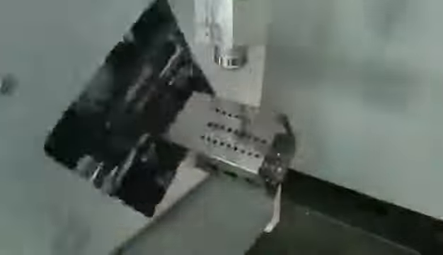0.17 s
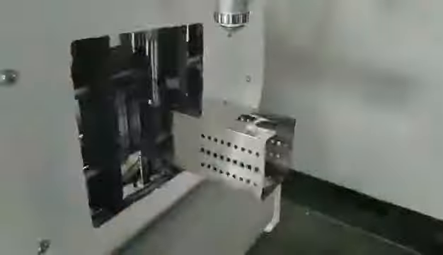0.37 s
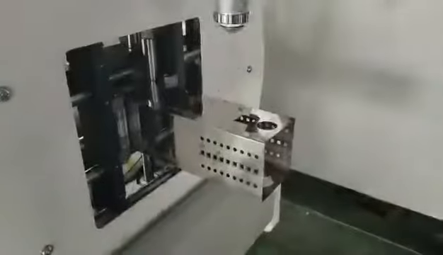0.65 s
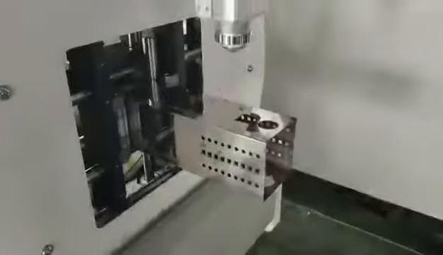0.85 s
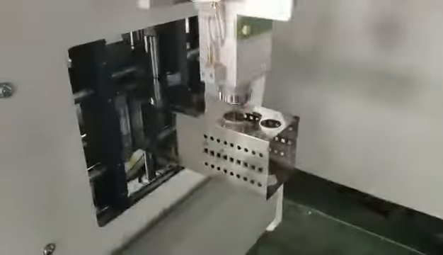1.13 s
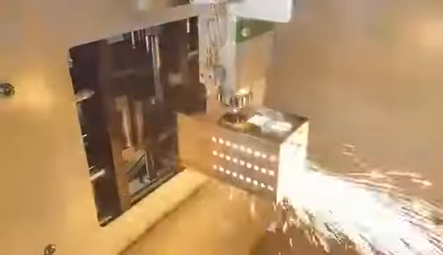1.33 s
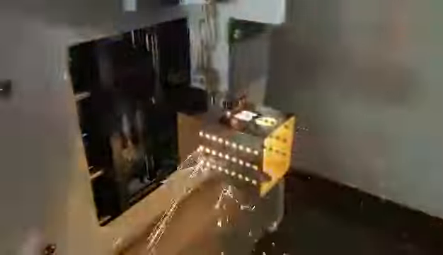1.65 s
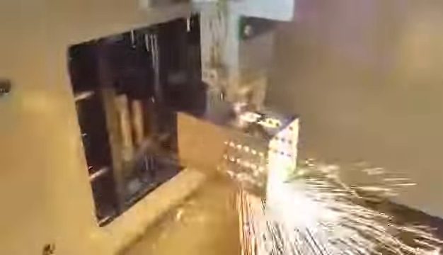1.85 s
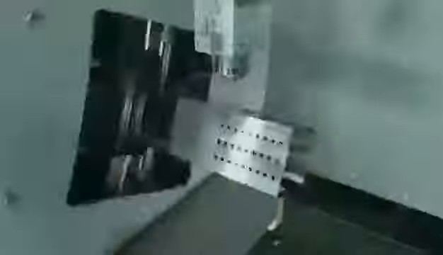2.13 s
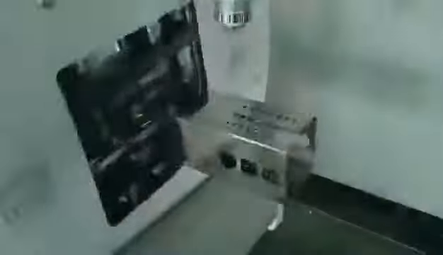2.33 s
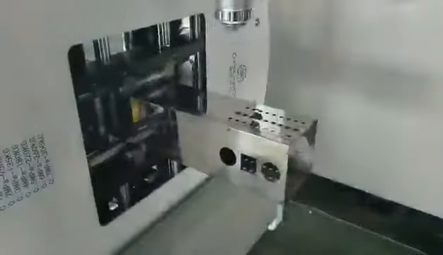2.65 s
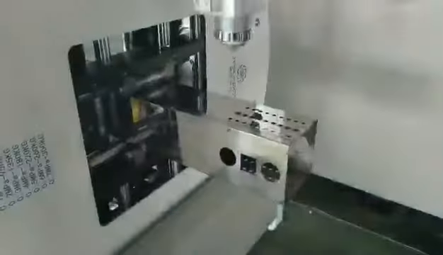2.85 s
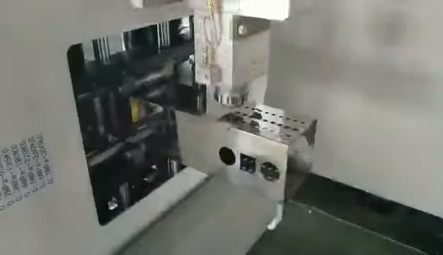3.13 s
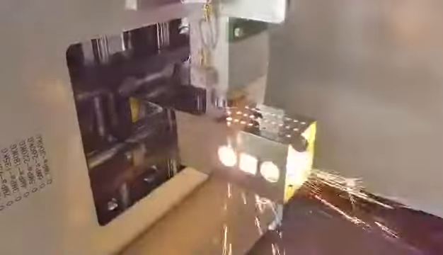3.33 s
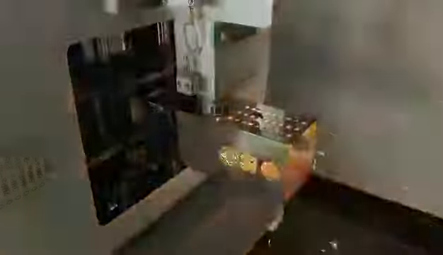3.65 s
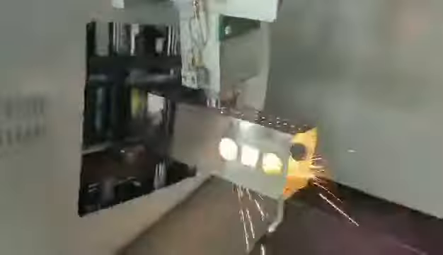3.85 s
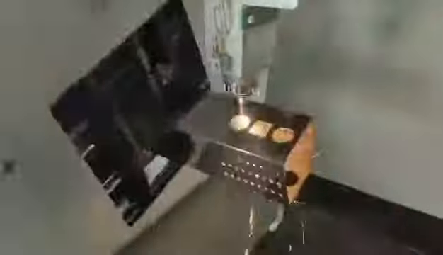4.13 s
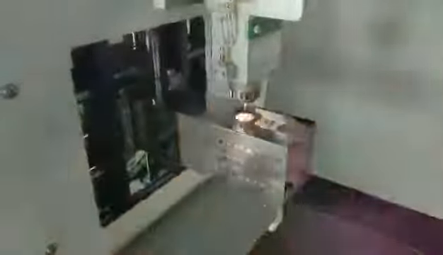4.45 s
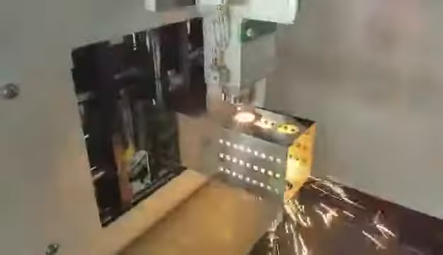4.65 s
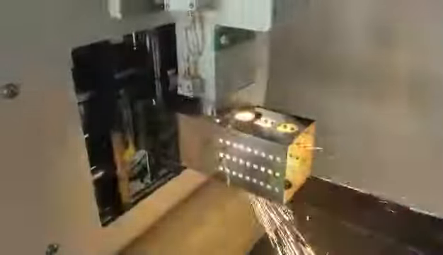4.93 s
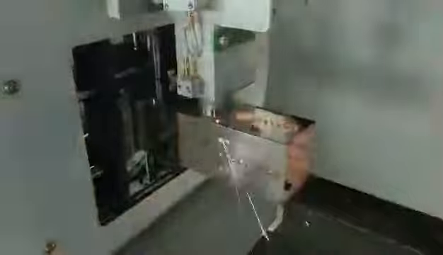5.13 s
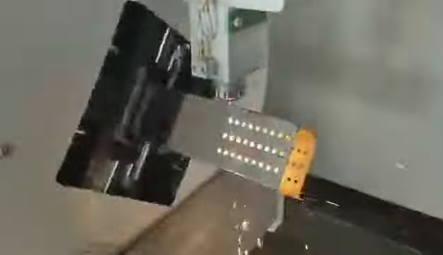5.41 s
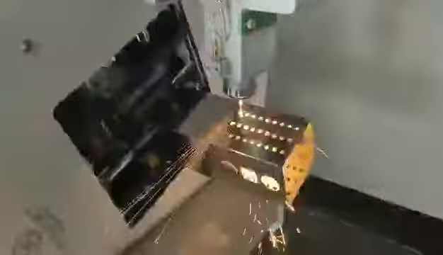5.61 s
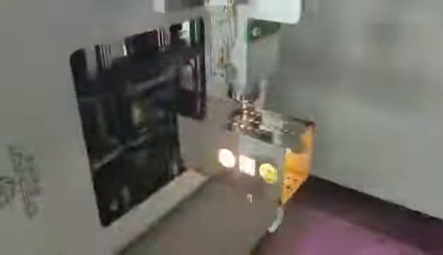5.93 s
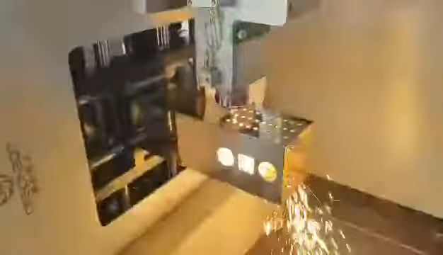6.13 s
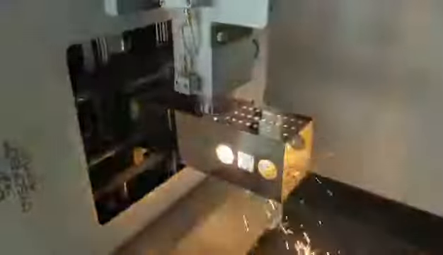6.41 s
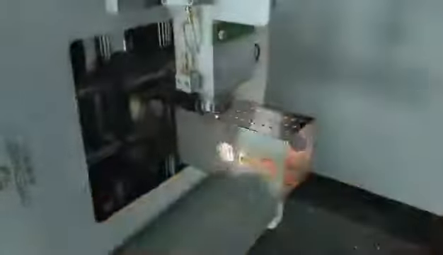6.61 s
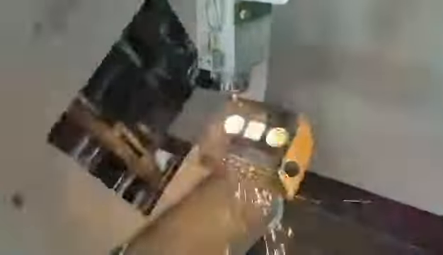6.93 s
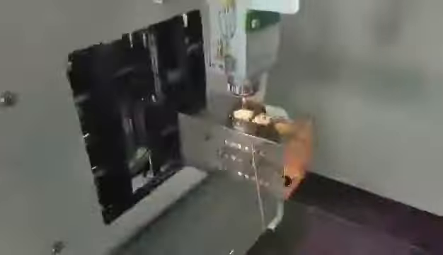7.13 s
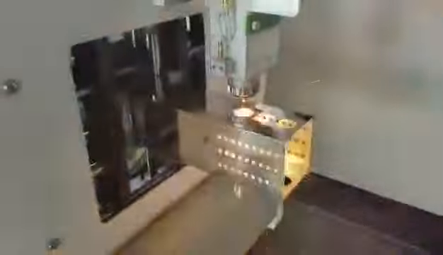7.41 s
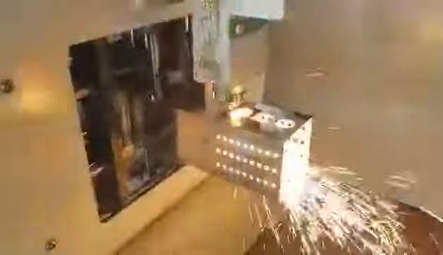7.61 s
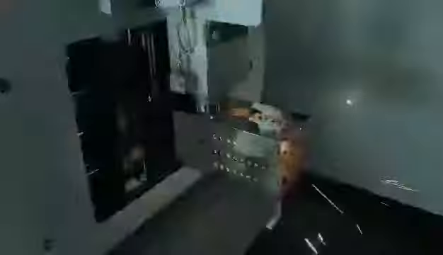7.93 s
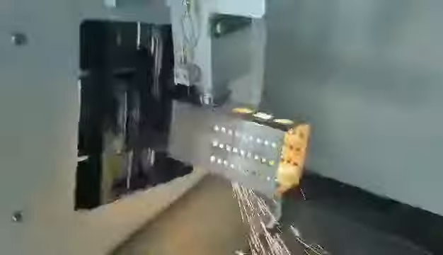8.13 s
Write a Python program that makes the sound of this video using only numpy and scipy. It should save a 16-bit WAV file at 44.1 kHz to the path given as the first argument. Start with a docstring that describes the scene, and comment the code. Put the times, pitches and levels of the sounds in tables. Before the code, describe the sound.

Pressurized gas hisses and roars on thin steel tube, with a wavering high whistle, spark ticks, sharp clicks, servo whirrs and one hard ringing burst.

```python
"""Assist gas jets from a laser cutting head onto a thin square steel tube in a workshop: noise that hisses in
the open, roars on the steel and howls in the hollow tube, with gushes, ringing bursts and a diffuse echo. The
beam, pulsed about 5000 times a second, whistles as two wavering sines and spits sparks as random ticks. Noise
clicks and low sagging thuds mark valves and head; servos hum and whirr, drives rumble and a fan hums. Both
channels carry the same microphone signal."""
import sys
import numpy as np
from scipy import signal
from scipy.fft import rfft, irfft, next_fast_len
from scipy.io import wavfile
from scipy.ndimage import uniform_filter1d, map_coordinates

SR = 44100
rng = np.random.default_rng(int(sys.argv[2]) if len(sys.argv) > 2 else 0)


def digitize_waveform(pressure):
    """Quantize a signal to 16-bit integers and store it at the path in sys.argv[1].

    Rows of a 2-D input are taken as channels; values are limited to [-1, 1].
    """
    field = np.atleast_2d(pressure).T
    bounded = np.clip(field, -1, 1)
    quanta = np.round(bounded * 32767).astype(np.int16)
    wavfile.write(sys.argv[1], SR, quanta)


N = 364442

# Colours of the open and the striking jet. Each row: frequency in Hz, relative density in dB per Hz.
HISS_COLOUR = [(1500, -22.5), (3000, -11), (4800, -10), (5700, -8.5), (6400, -4), (7300, -6.5), (8000, 2),
               (9300, 1.5), (10400, -0.5), (11200, -1.5), (12300, -7), (14200, -13)]
ROAR_COLOUR = [(60, -43.5), (250, -6), (550, -13), (900, -14.5), (1300, -1.5), (1700, 5), (2400, -1.5),
               (3300, 2.5), (4600, -9.5), (6000, -4.5), (9000, -26)]
# Resonances of the hollow tube and of the nozzle. Each row: centre in Hz, width in Hz, relative level in dB.
TUBE_MODES = [(3350, 770, -6.5), (3785, 400, -1.5), (4165, 560, -2.5), (5420, 700, -6.5), (7130, 790, -6.5),
              (7650, 230, -5)]
NOZZLE_MODES = [(13080, 2900, -2), (13300, 380, 0), (13500, 360, 0.5)]
# Narrow bands the steel housing lifts or dips. Each row: centre in Hz, width in Hz, gain in dB.
HOUSING_BANDS = [(515, 40, 5.5), (646, 52, -0.5), (754, 32, 5.5), (950, 46, -2), (1019, 98, 5.5),
                 (1208, 40, -4.5), (1265, 73, 5.5), (1640, 210, -4.5), (1801, 36, 5.5), (1985, 120, -2),
                 (2824, 32, -12), (2866, 71, 3.5), (3465, 70, 4.5), (3603, 65, -5), (3652, 72, 6),
                 (4810, 83, -0.5), (6060, 120, 3.5), (7640, 1000, 3.5), (8400, 270, -2.5)]
# Colour of the machine's rumble. Each row: frequency in Hz, relative density in dB per Hz.
RUMBLE_COLOUR = [(20, -36), (40, -5), (70, 0.5), (115, -2), (170, 1), (260, -0.5), (420, -0.5), (650, 1),
                 (1000, -1.5), (1500, -6), (3000, -51)]
# Moves of the servos. Each row: start in seconds, end in seconds, hum at top speed in Hz, hum level in dB,
# overtone slope in dB per octave, gear whirr in dB.
SERVO_MOVES = [(0.134, 0.554, 144, -46.5, -12, -44), (2.121, 2.535, 139, -47, -2.5, -47.5),
               (5.273, 5.723, 87, -48.5, -4, -49), (6.662, 7.19, 87, -51, -3.5, -47),
               (7.45, 8.35, 65, -48.5, -12.5, -59), (7.87, 8.35, 86, -56, -17, -61)]
# Low thuds: two soft bumps at the start, then the head's thumps. Each row: time in seconds,
# level in dB before a 1.5 dB lift, starting pitch in Hz, 60 dB decay in seconds.
LOW_THUDS = [(0.051, -33, 110, .07), (.115, -38, 110, 0.059), (1.1822, -17.5, 211, 0.021),
             (3.197, -27.5, 133, 0.048)]
# Sharp noise clicks: valves opening, ticks of the head's thumps, the crack of the blast.
# Each row: time in seconds, level in dB, 60 dB decay in seconds.
NOISE_CLICKS = [(0.535, -29.5, 0.31), (1.1833, -15, 0.029), (1.941, -18, 0.037), (2.544, -29, 0.44),
                (3.197, -16.5, 0.042)]
# Colour of the clicks and of the spark ticks. Each row: frequency in Hz, relative density in dB per Hz.
CLICK_COLOUR = [(500, -21), (2500, -1.5), (5000, -1), (6500, 0), (10000, 3.5), (14000, -2)]
# Bursts of gas, and at 4.41 s a tap on steel that rings the tube wall. Each row: time in seconds,
# noise level in dB, noise's 60 dB decay in seconds, ring in dB.
BURSTS = [(1.9358, -12.5, 0.26, -12), (2.01, -25, 1, -40), (4.41, -27.5, 0.21, -24)]
# Colour of the bursts' noise. Each row: frequency in Hz, relative density in dB per Hz.
BURST_COLOUR = [(100, -9), (350, -6), (520, 0.5), (830, 3), (1100, 0), (2000, 3), (2700, 2), (3800, 4),
                (5000, 2.5), (7000, -3), (9000, -6), (14000, -4)]
# Ringing tones of the bursts, the last a short high one. Each row: frequency in Hz, relative level in dB,
# 60 dB decay in seconds.
RING_TONES = [(845, -13.5, 0.41), (2630, -13, 0.26), (3650, -15, .15), (12100, -2, 0.11)]
# The gas valve is open. Each row: opening in seconds, closing in seconds.
GAS_SUPPLY = [(-.1, .165), (.535, 2.295), (2.544, 8.5)]
# The jet gushes louder over open air, holes and edges. Each row: start in seconds, end in seconds,
# 60 dB release in seconds, hiss in dB, tube howl in dB, nozzle sizzle in dB.
JET_GUSHES = [(-.06, 0.17, 0.15, -26.5, -26, -28), (0.557, 1.014, 0.42, -28, -40, -26),
              (.76, 0.953, 1, -35, -29.5, -42), (1.52, 1.95, .5, -36, -42.5, -48),
              (1.8, 2.08, .3, -34.5, -39, -39), (2.037, 2.115, 0.51, -24, -39, -29),
              (2.19, 2.25, 0.27, -24.5, -26, -30), (2.577, 2.988, 0.99, -26, -23, -27),
              (2.735, 3.387, 0.37, -29.5, -29, -43), (3.31, 3.703, .35, -38, -32.5, -38),
              (3.674, 3.944, 0.27, -42, -31, -50), (3.8, 3.943, 0.32, -26, -33, -45),
              (4.02, 4.267, 0.54, -34, -39.5, -33.5), (4.517, 5.08, .3, -42, -44, -39),
              (5.278, 5.453, .3, -43, -36, -46), (5.435, 5.623, 0.97, -22, -26.5, -30),
              (5.607, 6.27, 0.45, -26.5, -32, -41), (6.016, 6.874, 1, -30.5, -30.5, -38),
              (6.665, 6.863, .3, -25.5, -45, -47), (6.93, 7.132, 0.79, -32, -39.5, -31),
              (7.21, 7.53, 0.34, -36.5, -44, -43), (7.408, 7.99, .35, -39, -42, -35),
              (8.162, 8.3, .5, -40, -36, -40)]
# The jet strikes steel as the head closes in or a corner of the tube turns past. Each row: time in seconds,
# half width in seconds, roar in dB, rumble in dB.
STEEL_STRIKES = [(0.093, 0.041, -25.5, -35), (.74, 0.13, -32, -44), (1.0, 0.058, -27.5, -36.5),
                 (1.7, 0.072, -41, -58), (2.045, 0.066, -30.5, -36), (2.31, 0.086, -33.5, -47),
                 (2.77, 0.23, -29.5, -43), (3.02, 0.039, -24, -36.5), (3.6, 0.88, -43.5, -71),
                 (4.11, 0.1, -38, -39.5), (4.53, 0.2, -48, -47.5), (5.02, 0.18, -41.5, -48.5),
                 (5.56, 0.16, -35, -43), (6.0, 0.2, -40, -49.5), (6.6, 0.22, -41, -56),
                 (6.99, .07, -35, -39), (7.33, 0.28, -44.5, -46), (7.61, .06, -39.5, -50),
                 (7.96, 0.15, -40.5, -48), (8.23, .07, -38.5, -40)]
# The beam burns. Each row: start in seconds, end in seconds.
BEAM_CUTS = [(1.226, 2.1), (3.215, 4.622), (4.654, 8.5)]
# Swells of the whistle along a contour. Each row: time in seconds, half width in seconds,
# level at the pulse rate in dB, level an octave up in dB.
WHISTLE_SWELLS = [(1.37, .145, -36.5, -49), (1.69, 0.16, -40, -62), (3.285, 0.044, -54, -43),
                  (3.47, 0.051, -40.5, -36), (3.99, 0.082, -33.5, -52), (4.13, 0.066, -43, -38),
                  (4.563, .037, -34, -36), (4.76, 0.091, -33.5, -54), (4.91, 0.033, -34.5, -39),
                  (5.28, .045, -63, -50), (5.44, 0.093, -34.5, -56), (5.555, .045, -35, -40),
                  (6.008, .028, -36.5, -58), (6.23, .09, -43, -45), (6.375, 0.038, -35.5, -37),
                  (6.875, 0.076, -33.5, -58), (6.995, 0.089, -40.5, -35), (7.46, 0.055, -35.5, -43),
                  (7.635, 0.061, -32, -46), (7.803, 0.055, -32, -42.5), (8.15, 0.045, -47, -45),
                  (8.265, 0.053, -39.5, -41)]
# The head lands and squeezes the jet. Each row: time in seconds, level in dB.
HEAD_LANDINGS = [(.125, -33.5), (1.0, -31.5), (3.005, -29)]
# Bands the squeezed jet sweeps down through. Each row: centre in Hz, width in Hz, relative level in dB,
# lead before the landing in seconds.
SQUEEZE_BANDS = [(6000, 910, 2, 0.056), (2750, 1500, 1, .025), (1820, 620, 2, 0)]
# Gear noise of the chuck. Each row: centre in Hz, width in Hz, relative level in dB.
GEAR_MODES = [(251, 210, 0), (396, 80, 0.5), (560, 100, -4)]

TOP_HZ = 14150  # microphone's band limit
FILL_S, DRAIN_T60_S = 0.052, 1  # gas line: time constant of filling, 60 dB decay of emptying
HISS_DB, HOWL_DB, ROAR_DB, SIZZLE_DB = -36, -41, -45.5, -37.5  # jet sinking cleanly into a cut
GUSH_RISE_S = 0.031  # time constant
STRIKE_SKIRT, WHISTLE_SKIRT = 4.07, 6  # how steeply each swell falls away on either side
SQUEEZE_S, SQUEEZE_SKIRT = 0.028, 2.7  # half width and steepness of each band's swell
RUMBLE_DB = -49.5  # drives and extraction
FAN_HZ, FAN_DB = 400.7, -59.5  # extraction fan's hum
SERVO_PEAK = 0.773  # under 1: a move speeds up faster than it brakes
PULSE_HZ = 5000.3  # laser pulse rate
LINE_DB, OCTAVE_DB = -54, -51  # whistle between its swells
BEAM_EDGE_S = 0.014  # softness of switching on and off
WORKSHOP_T60_S, WORKSHOP_DB = 1.75, -13  # the room's answer to the jet


def amp(db):
    """Decibels to gain."""
    return 10 ** (np.asarray(db) / 20)


def unit(x):
    """Scaled to rms 1."""
    return x / np.sqrt(np.mean(x ** 2) + 1e-20)


def clock():
    """The time of each sample in seconds."""
    return np.arange(N) / SR


def wobble(rate):
    """A smooth random curve with rate knots a second."""
    knots = rng.standard_normal(int(N * rate / SR) + 4)
    return map_coordinates(knots, [np.arange(N) * rate / SR])


def filtered(x, response):
    """x shaped by a response of frequency, padded against wrap-around."""
    size = next_fast_len(N + SR // 2)
    spectrum = rfft(x, size) * response(np.fft.rfftfreq(size, 1 / SR))
    return irfft(spectrum, size)[:N]


def slope(points):
    """Response through (Hz, dB) points on a log frequency axis."""
    f, db = np.transpose(points)
    return lambda hz: amp(np.interp(np.log(hz + 1), np.log(f), db))


def resonant(modes):
    """Response of resonances with steep skirts, added in power."""
    def response(hz):
        peaks = [amp(db) / (1 + 2 * ((hz - f) / width) ** 2) for f, width, db in modes]
        return np.sqrt(sum(peak ** 2 for peak in peaks))
    return response


def housing(hz):
    """Response of the steel housing, whose lifts and dips add in dB."""
    return amp(sum(db * np.exp(-2 * ((hz - f) / width) ** 2) for f, width, db in HOUSING_BANDS))


def rush(colour, patchy_db):
    """Coloured noise of rms 1 whose spectrum varies randomly in patches, within patchy_db."""
    bins = signal.stft(rng.standard_normal(N), nperseg=512)[2]
    field = uniform_filter1d(rng.standard_normal(bins.shape), size=2, axis=0)  # across frequency
    field = uniform_filter1d(field, size=9, axis=1)  # along time
    patches = amp(patchy_db * np.tanh(unit(field)))
    noise = signal.istft(bins * patches, nperseg=512)[1][:N]
    return unit(filtered(noise, lambda hz: colour(hz) * housing(hz)))


def decay(s, t60, attack):
    """Envelope of a blow at time s."""
    age = np.maximum(clock() - s, 0)
    return (1 - np.exp(-age / attack)) * np.exp(-np.log(1000) * age / t60)


def held(start, end, rise, t60):
    """Envelope that rises from start, holds until end and dies away."""
    t = clock()
    opening = 1 - np.exp(-np.maximum(t - start, 0) / rise)
    return opening * np.exp(-np.log(1000) * np.maximum(t - end, 0) / t60)


def bell(s, width, skirt):
    """Envelope that tops out around time s and falls away on both sides."""
    return 1 / np.sqrt(1 + (np.abs(clock() - s) / width) ** skirt)


def stacked(base_db, shapes, levels_db):
    """Gain of a steady level with events on top, added in power."""
    events = sum((amp(db) * shape) ** 2 for shape, db in zip(shapes, levels_db))
    return np.sqrt(amp(base_db) ** 2 + events)


def passes():
    """One envelope for each strike: it peaks as the steel comes closest to the nozzle."""
    return [bell(s, width, STRIKE_SKIRT) for s, width, _, _ in STEEL_STRIKES]


def burning():
    """1 while the beam is on, 0 between cuts, with soft edges."""
    t = clock()
    cuts = [np.tanh((t - start) / BEAM_EDGE_S) - np.tanh((t - end) / BEAM_EDGE_S) for start, end in BEAM_CUTS]
    return sum(cuts) / 2


def gas():
    """The valve feeds a jet that hisses in the open, roars on steel and excites tube and nozzle resonances."""
    pressure = np.max([held(opens, closes, FILL_S, DRAIN_T60_S) for opens, closes in GAS_SUPPLY], axis=0)
    gushes = [held(start, end, GUSH_RISE_S, t60) for start, end, t60, *_ in JET_GUSHES]
    *_, hiss_db, howl_db, sizzle_db = np.transpose(JET_GUSHES)
    *_, roar_db, _ = np.transpose(STEEL_STRIKES)
    hiss = stacked(HISS_DB, gushes, hiss_db) * rush(slope(HISS_COLOUR), patchy_db=6.5)
    howl = stacked(HOWL_DB, gushes, howl_db) * rush(resonant(TUBE_MODES), patchy_db=3.5)
    roar = stacked(ROAR_DB, passes(), roar_db) * rush(slope(ROAR_COLOUR), patchy_db=6.0)
    sizzle = stacked(SIZZLE_DB, gushes, sizzle_db) * rush(resonant(NOZZLE_MODES), patchy_db=3.5)
    flutter = amp(0.23 * wobble(10) + 0.58 * wobble(25) + 0.2 * wobble(140))  # the whole jet flaps a little
    return pressure * flutter * (hiss + howl + roar + sizzle + landings())


def rumble():
    """Drives and extraction rumble as low noise, more when the jet strikes steel."""
    *_, strike_db = np.transpose(STEEL_STRIKES)
    return stacked(RUMBLE_DB, passes(), strike_db) * rush(slope(RUMBLE_COLOUR), patchy_db=4.5)


def fan():
    """The extraction fan hums on one tone, wavering a little in level and phase."""
    level = np.sqrt(2) * amp(FAN_DB + 0.74 * wobble(5))
    return level * np.sin(2 * np.pi * FAN_HZ * clock() + 0.28 * wobble(5))


def thuds():
    """Two soft bumps, then the head's thumps: low tones that sag in pitch as they die."""
    out = np.zeros(N)
    for s, db, hz, t60 in LOW_THUDS:
        age = np.maximum(clock() - s, 0)
        sag = 0.32 * t60  # the time in which the pitch halves
        turns = hz * sag * np.log1p(age / sag)
        out -= amp(db + 1.5) * decay(s, t60, attack=0.00097) * np.sin(2 * np.pi * turns)
    return out


def landings():
    """The gap under the nozzle closes: a bright rush sweeps down from the treble."""
    out = np.zeros(N)
    for hz, width, band_db, lead in SQUEEZE_BANDS:
        level = sum(amp(db + band_db) * bell(s - lead, SQUEEZE_S, SQUEEZE_SKIRT) for s, db in HEAD_LANDINGS)
        out += level * rush(resonant([(hz, width, 0)]), patchy_db=2.5)
    return out


def servos():
    """On each move a servo's rough hum and gear whirr rise and fall with its speed."""
    t = clock()
    out = np.zeros(N)
    whirr = rush(resonant(GEAR_MODES), patchy_db=8.5)
    for start, end, hz, db, overtone_db, whirr_db in SERVO_MOVES:
        progress = np.clip((t - start) / (end - start), 0, 1)
        speed = np.sqrt(np.abs(np.sin(np.pi * progress ** SERVO_PEAK)))
        out += amp(whirr_db) * speed ** 2 * whirr
        phase = 2 * np.pi * hz * np.cumsum(1 - 0.16 * (1 - speed)) / SR  # slower is slightly flatter
        for k in range(1, 4):
            level = amp(db + overtone_db * np.log2(k) + 5.3 * np.tanh(wobble(22)))
            out += level * speed * np.sin(k * phase + 0.5 * k * wobble(25))
    return out


def clicks():
    """Valves opening, the thumps' ticks and the blast's crack: noise with a sharp onset that dies away."""
    snaps = sum(amp(db) * decay(s, t60, attack=0.00022) for s, db, t60 in NOISE_CLICKS)
    return snaps * rush(slope(CLICK_COLOUR), patchy_db=10.0)


def beam():
    """The pulsed beam whistles at its pulse rate, swelling and fading as the head moves past reflections."""
    swells = [bell(s, width, WHISTLE_SKIRT) for s, width, _, _ in WHISTLE_SWELLS]
    *_, line_db, octave_db = np.transpose(WHISTLE_SWELLS)
    phase = 2 * np.pi * PULSE_HZ * clock()
    line_level = stacked(LINE_DB, swells, line_db) * amp(0.93 * wobble(25))
    octave_level = stacked(OCTAVE_DB, swells, octave_db) * amp(1.8 * wobble(25))
    line = line_level * np.sin(phase + 0.41 * wobble(42))
    octave = octave_level * np.sin(2 * phase + 0.82 * wobble(4))
    return np.sqrt(2) * burning() * (line + octave)  # root 2 makes the levels rms


def sparks(rate, level_db):
    """While the beam burns, molten drops tick at random, on average rate times a second."""
    struck = rng.random(N) < burning() * rate / SR
    drops = struck * rng.standard_normal(N)
    return amp(level_db) * filtered(drops, slope(CLICK_COLOUR))


def bursts():
    """Gas bursts and a tap on steel: decaying noise with ringing tones, duller when the ring is softer."""
    noise_level = sum(amp(db) * decay(s, t60, attack=0.0031) for s, db, t60, _ in BURSTS)
    noise = noise_level * rush(slope(BURST_COLOUR), patchy_db=3.0)
    hardest_db = max(ring_db for *_, ring_db in BURSTS)
    ring = np.zeros(N)
    for s, _, _, ring_db in BURSTS:
        for hz, tone_db, t60 in RING_TONES:
            dulling_db = (ring_db - hardest_db) * hz / TOP_HZ
            level = amp(ring_db + tone_db + dulling_db)
            tone = np.sin(2 * np.pi * hz * clock() + wobble(70))
            ring += level * decay(s, t60, attack=0.00051) * tone
    return noise + ring


def workshop(x):
    """The workshop's diffuse echo of x: a one-second tail of decaying noise."""
    age = np.arange(SR) / SR
    tail = rng.standard_normal(SR) * np.exp(-np.log(1000) * age / WORKSHOP_T60_S)
    return amp(WORKSHOP_DB) * signal.fftconvolve(x, tail / np.linalg.norm(tail))[:N]


def scene():
    """All sources meet at one microphone, the same on both channels; only jet and bursts echo in the workshop."""
    air = gas() + bursts()
    machine = rumble() + fan() + thuds() + servos() + clicks()
    cutting = beam() + sparks(rate=55, level_db=-38)
    mono = air + workshop(air) + machine + cutting
    return np.array([mono, mono])


def record(dry):
    """The microphone keeps nothing above its band limit."""
    return np.array([filtered(x, lambda hz: hz < TOP_HZ) for x in dry])


dry = scene()
out = record(dry)
digitize_waveform(out)
```